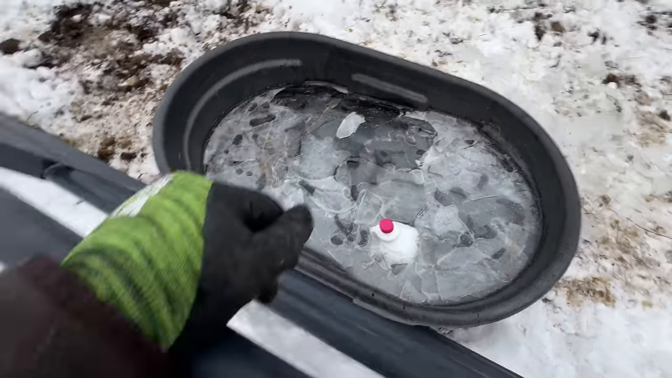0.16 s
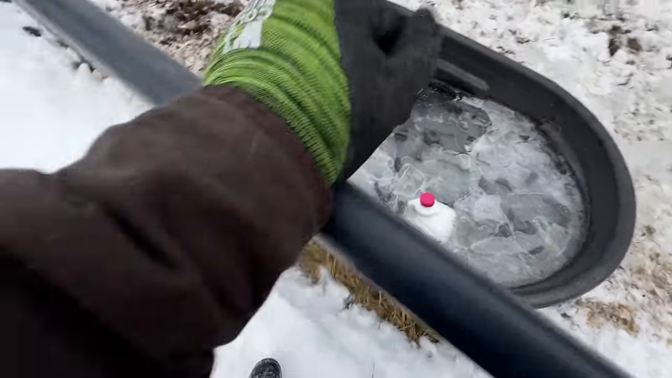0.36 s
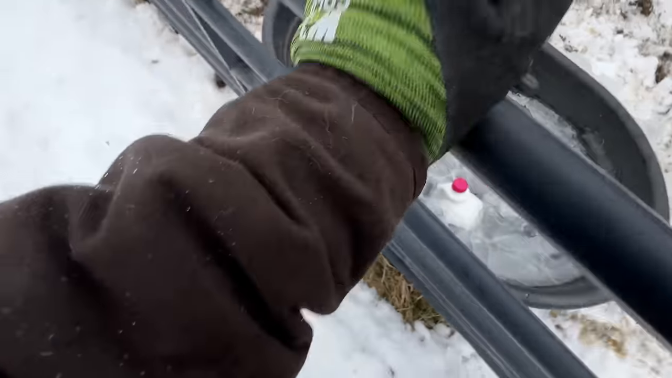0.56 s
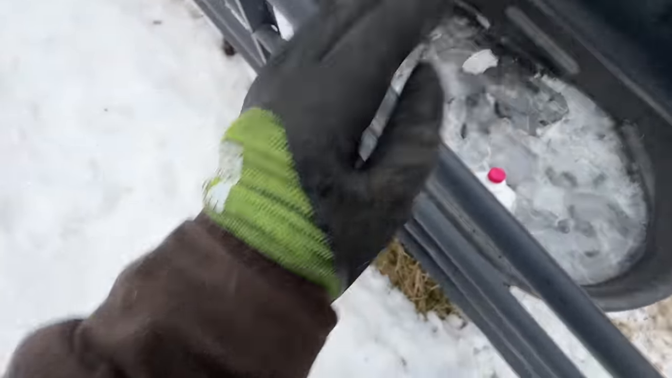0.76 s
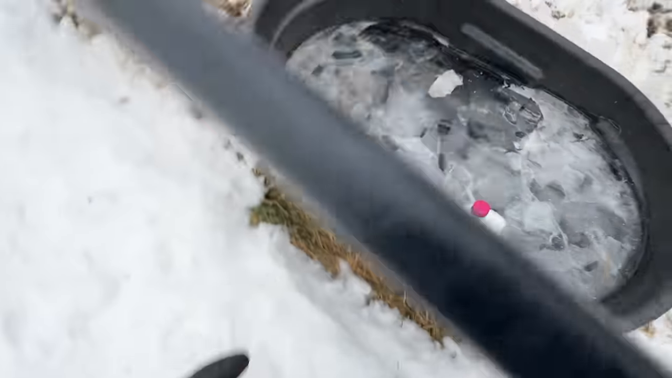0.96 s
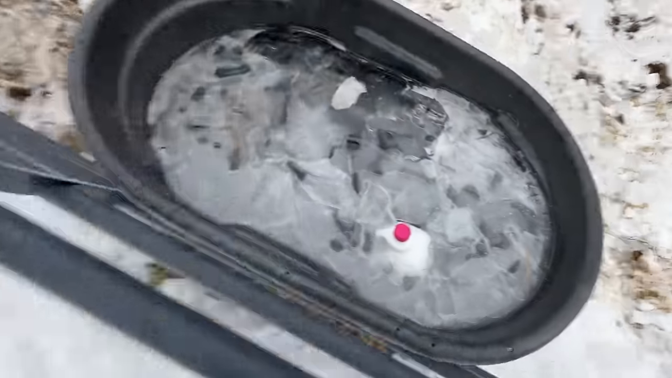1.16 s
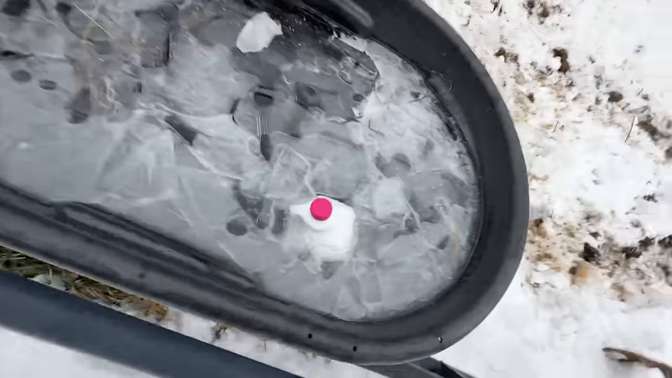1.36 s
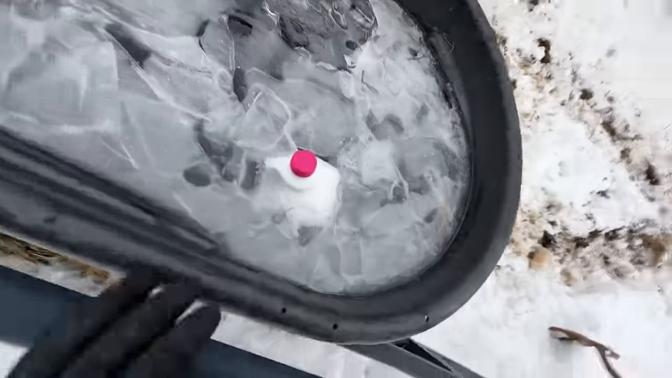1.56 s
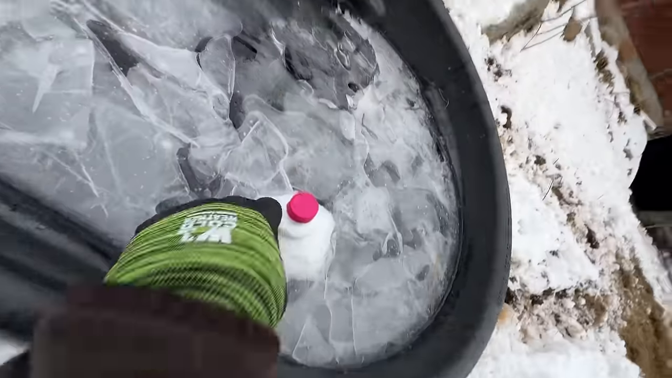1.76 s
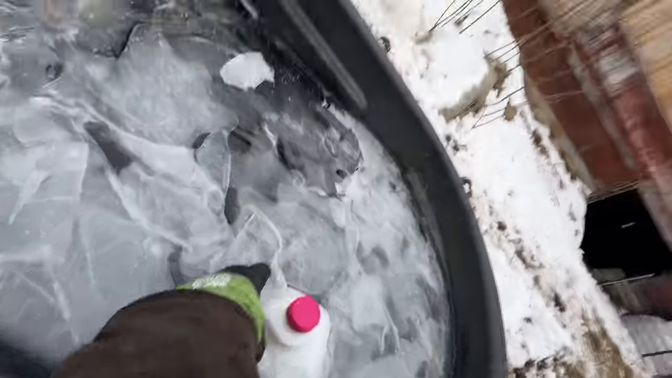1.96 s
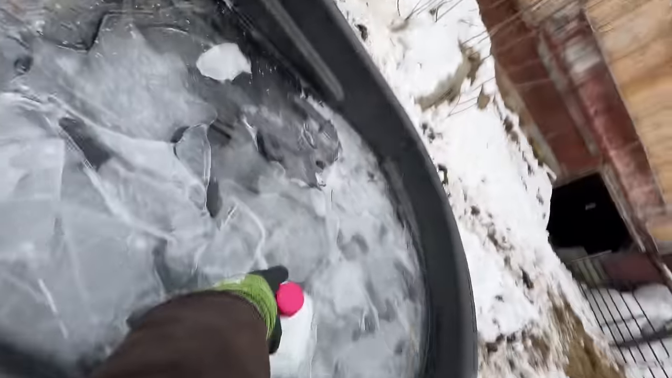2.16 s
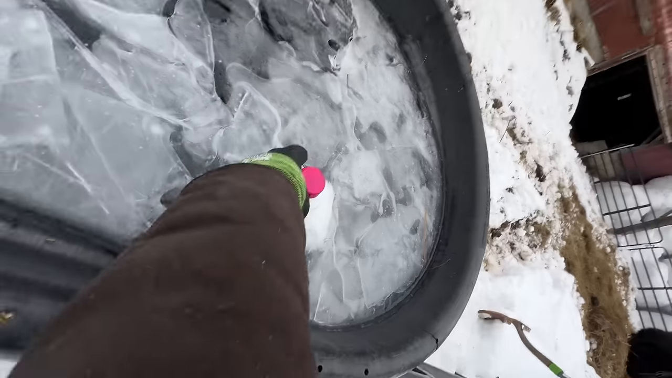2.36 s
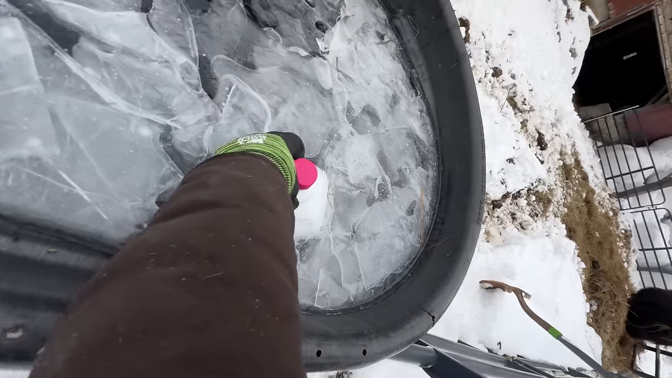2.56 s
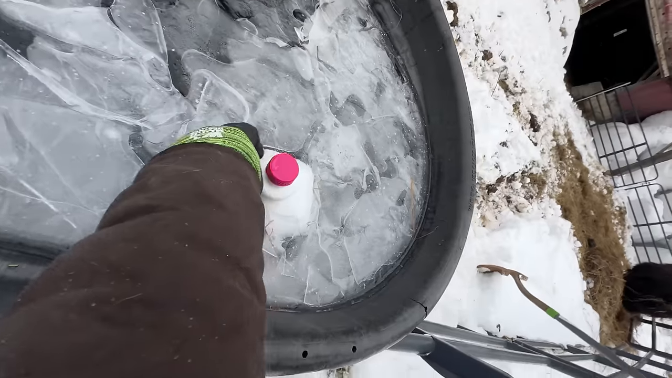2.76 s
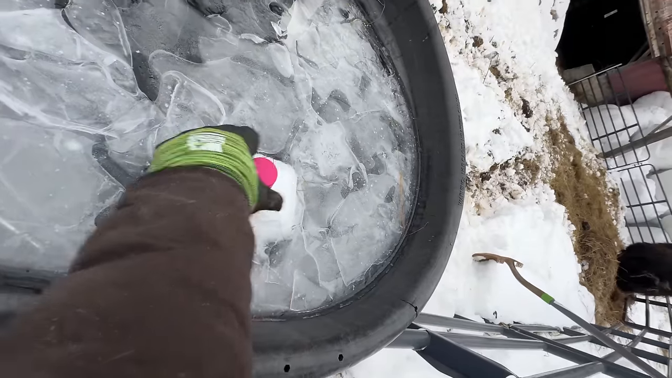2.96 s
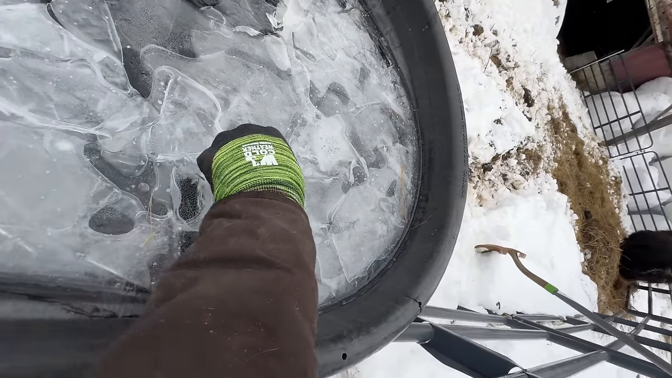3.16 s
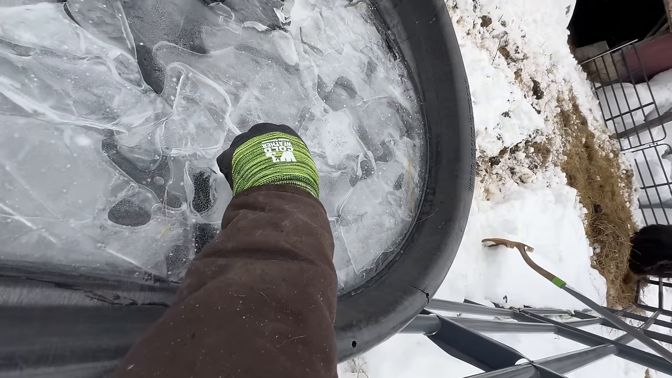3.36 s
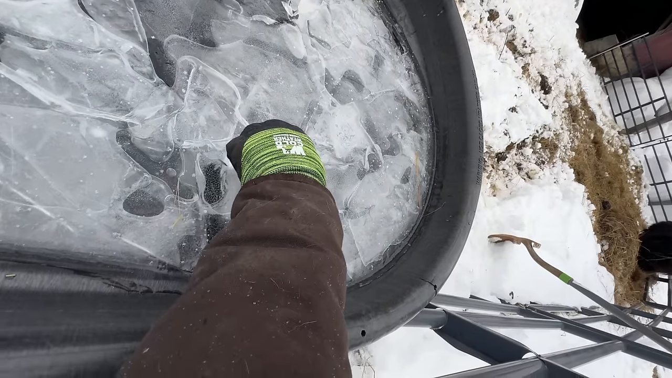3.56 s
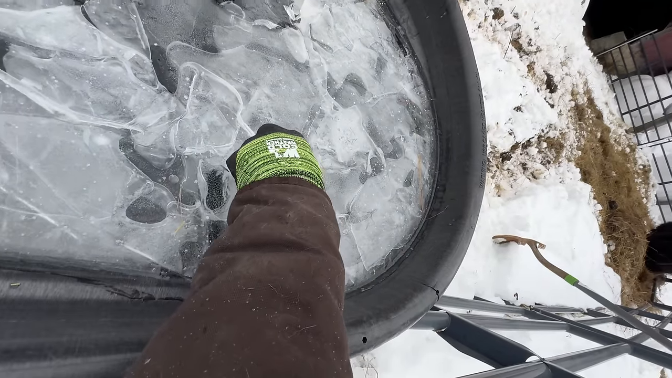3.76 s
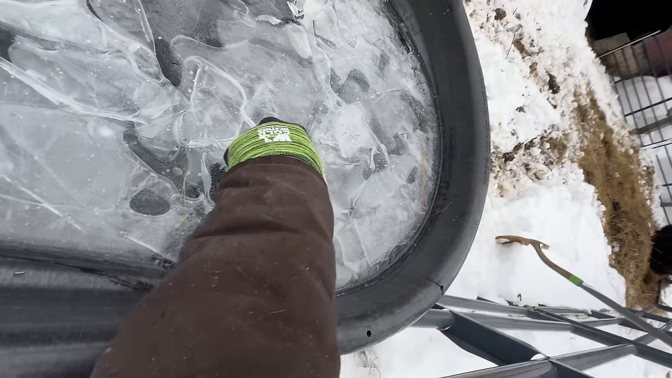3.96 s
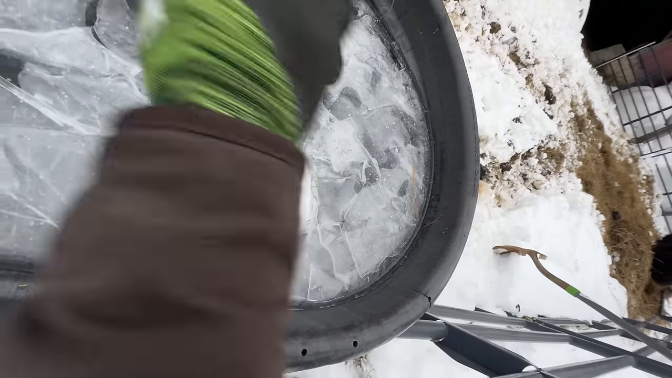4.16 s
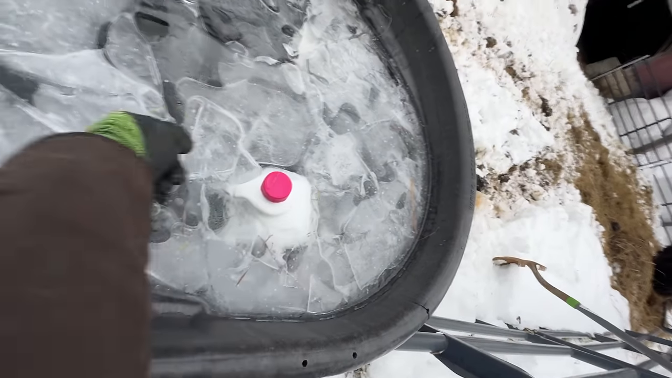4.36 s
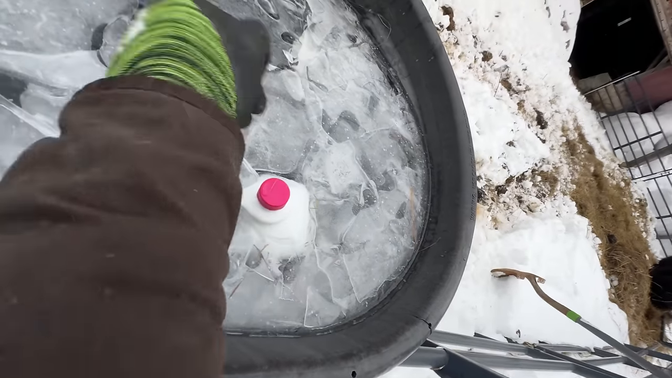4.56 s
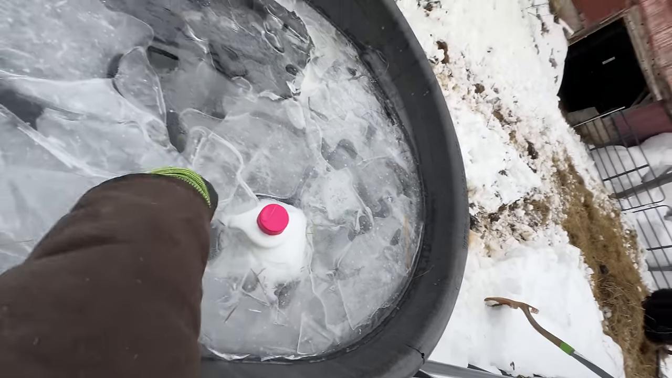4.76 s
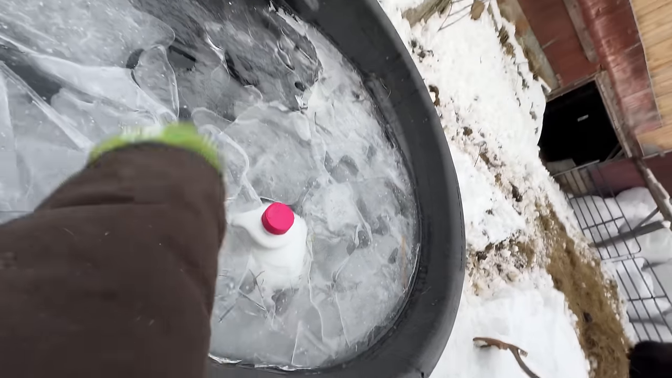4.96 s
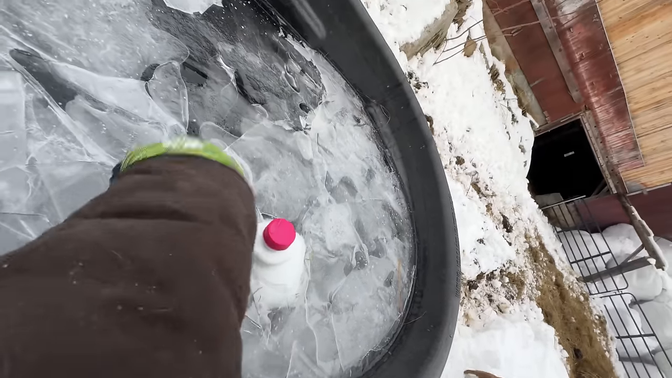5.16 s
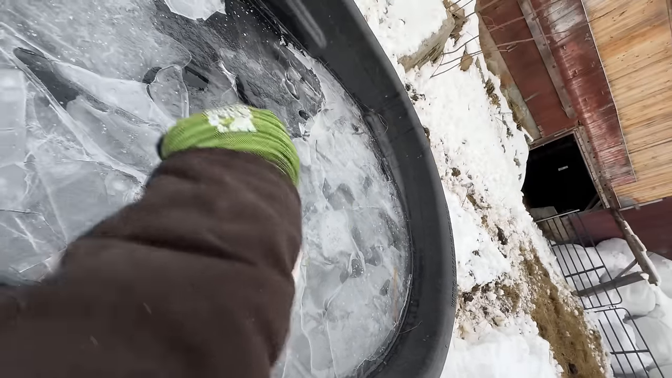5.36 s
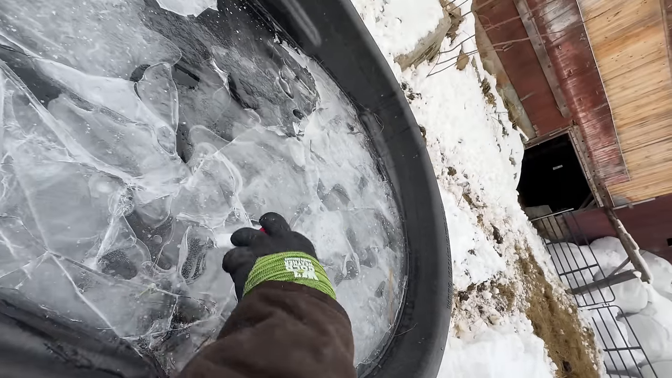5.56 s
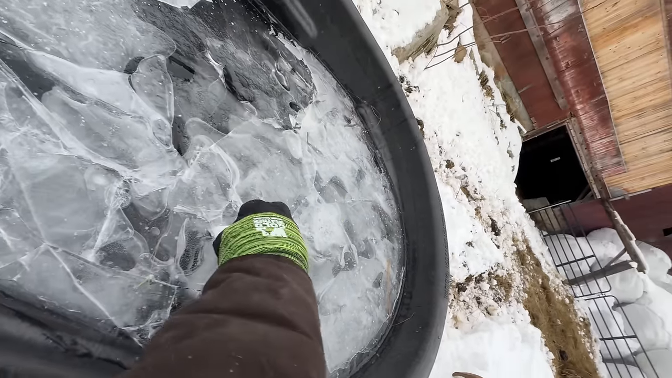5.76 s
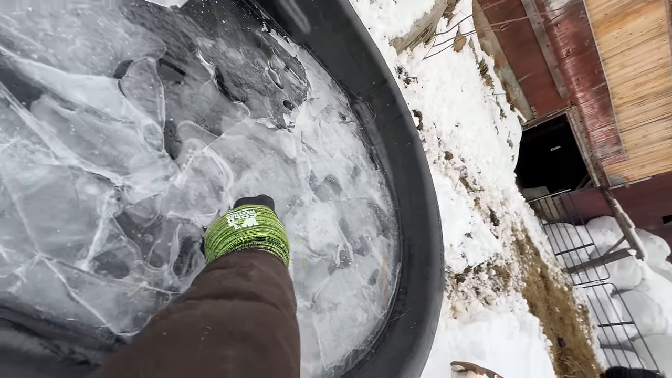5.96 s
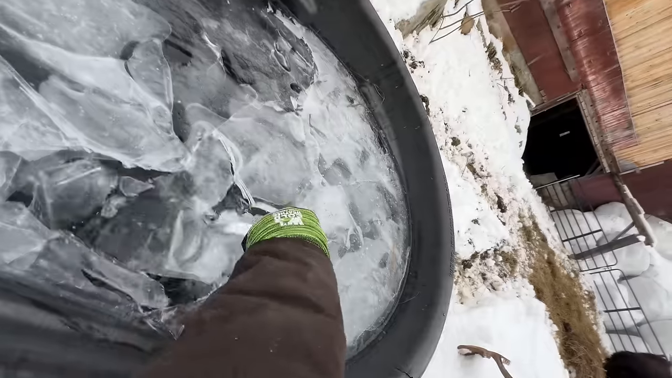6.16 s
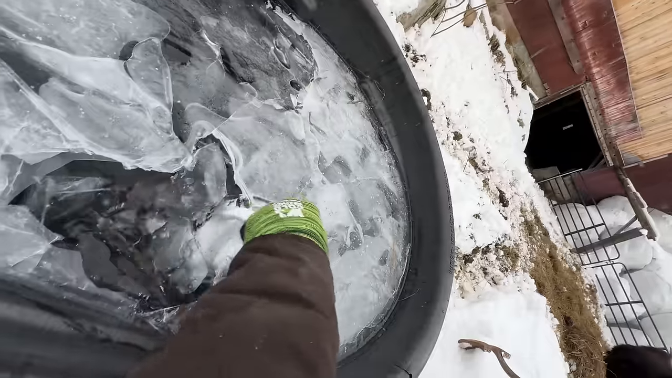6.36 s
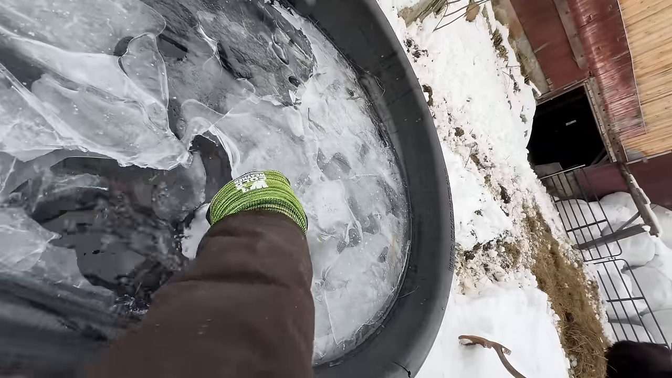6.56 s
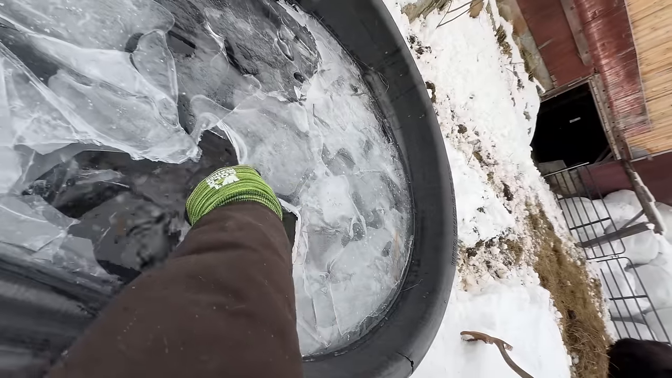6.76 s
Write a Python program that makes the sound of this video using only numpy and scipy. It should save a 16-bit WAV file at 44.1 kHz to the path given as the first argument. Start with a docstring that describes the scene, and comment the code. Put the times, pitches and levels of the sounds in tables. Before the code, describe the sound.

A sleeve rustles and knocks on metal rails, then fist punches boom on trough ice until it cracks apart, clinks and sloshes.

```python
"""Breaking the ice on a stock trough

Outdoors in snow, a gloved hand reaches through a steel gate to a plastic trough, its sleeve close to the microphone.
Cloth hisses and rubs (random slips, filtered) and the rails tap and bump; the ice ticks under a first push.
Three punches make the sheet boom on the water (decaying modes, a falling thud); a fourth blow comes as it gives way.
Plates crack, crumble and clink (fracture clicks, ringing shards) while water sloshes up (swarms of bubbles).
"""
import sys
import numpy as np
from scipy import signal
from scipy.fft import rfft, irfft, next_fast_len
from scipy.io import wavfile

SR = 44100
rng = np.random.default_rng(int(sys.argv[2]) if len(sys.argv) > 2 else 0)


def int16_out(signal):
    """Quantize to a 16-bit WAV file."""
    q = np.round(np.clip(np.atleast_2d(signal).T, -1, 1) * 32767)
    wavfile.write(sys.argv[1], SR, q.astype(np.int16))


N = 300762
TIME = np.arange(N) / SR   # s

# Table levels are relative: each source trims them as it is mixed.

# Two-port microphone: sound reaches the left port later by this lag; top of its range
PORT_LAG_S, CUTOFF_HZ = 4.25e-5, 15650
# Sound scattered by trough walls and body, against the direct sound: (pitch_hz, level_db)
SCATTER_SPECTRUM = [(100, -48.5), (300, -8), (700, 7.5), (2000, -2), (5000, 4.5), (8000, -2),
                    (12000, -20.5), (15500, 11.5)]
# The yard's faint tail
YARD_DB, YARD_T60_S = -21.5, 0.35

# Still air of the yard: (pitch_hz, level_db per Hz)
AIR_SPECTRUM = [(25, -18), (130, 18.5), (400, -8), (700, -15), (1200, -13), (2500, -13), (5000, -27),
                (9000, -22), (15500, -30)]
AIR_DB, AIR_WIDE_DB = -62, 14   # overall, and the diffuse part against the shared part

# Sleeve and glove rubbing close to the microphone, as curves: (time_s, dull_rub_db, fibre_hiss_db)
# The arm reaches in
REACH_CURVE = [(0.0, -91, -73), (0.1, -61, -67.5), (0.3, -60.5, -60.5), (0.49, -64.5, -64.5),
               (0.56, -59, -52.5), (0.8, -63, -58), (1.37, -52, -63), (1.61, -59, -56.5),
               (1.98, -56.5, -62), (2.16, -68.5, -60.5), (2.35, -63.5, -69)]
# The sleeve rubs softly and evenly between reaching and working
EVEN_RUB_CURVE = [(2.5, -58, -62), (2.92, -58, -62)]
# The arm works on the ice
LEAN_CURVE = [(2.99, -54.5, -54), (3.16, -59.5, -64), (3.42, -64.5, -69.5), (3.89, -67, -67),
              (4.3, -59.5, -60.5), (4.6, -67.5, -69.5), (4.93, -85, -105), (5.25, -66.5, -63.5),
              (5.37, -70.5, -81), (5.49, -62.5, -70), (5.6, -59.5, -63)]
# Strokes of glove and sleeve against the gate: (start_s, length_s, hiss_db, rub_db)
BRUSH_STROKES = [(0.243, 0.049, -60, -55), (0.657, 0.33, -60, -45), (0.949, 0.12, -44.5, -54),
                 (1.122, 0.077, -42.5, -35), (1.253, 0.055, -37.5, -33), (1.317, 0.052, -39, -35),
                 (1.371, 0.04, -41, -32), (1.412, 0.096, -39.5, -34.5), (1.563, 0.021, -46, -43),
                 (1.954, 0.099, -58.5, -44), (2.091, 0.045, -59, -42), (4.048, 0.044, -47.5, -48),
                 (5.447, 0.12, -80, -46), (5.632, 0.076, -70, -42.5)]
# Dull rub of cloth: (pitch_hz, level_db per Hz)
RUB_SPECTRUM = [(25, -9), (70, 1), (130, 0), (280, 2.5), (450, -3.5), (600, -11), (800, -20), (1200, -13),
                (1800, -13.5), (5000, -28)]
# Fine hiss of fibres: (pitch_hz, level_db per Hz)
FIBRE_SPECTRUM = [(400, -36), (900, -9), (1500, -1), (2400, 2.5), (3100, -0.5), (4800, -6), (7800, -1.5),
                  (10000, 7), (12000, -26), (15500, -15)]
FOLDS_DB = 2.0       # depth of the flutter as folds of cloth catch and pass
STROKE_RISE = 0.028  # share of a stroke's length that it takes to build up

# Arm bumping and dragging on the hollow gate rails: (start_s, length_s, level_db, pitch_hz)
RAIL_BUMPS = [(0.276, 0.027, -48.5, 328), (0.347, 0.014, -48, 590), (0.706, 0.21, -43.5, 285),
              (0.807, 0.011, -35, 230), (0.891, 0.011, -31.5, 300), (0.995, 0.039, -47, 297),
              (1.056, 0.021, -46, 236), (1.137, 0.026, -31, 322), (1.169, 0.028, -35, 246),
              (1.259, 0.029, -30.5, 266), (1.283, 0.081, -37, 100), (1.334, 0.027, -38.5, 417),
              (1.383, 0.041, -35, 252), (1.385, 0.028, -43.5, 520), (1.41, 0.097, -41.5, 147),
              (1.492, 0.03, -37, 221), (1.591, 0.015, -38, 130), (1.788, 0.0093, -41, 278),
              (1.966, 0.08, -37.5, 127), (1.969, 0.029, -45, 292), (5.571, 0.088, -47, 263),
              (5.657, 0.1, -42, 396)]
# Knuckles tapping the gate rail: (start_s, level_db, t60_s)
RAIL_TAPS = [(0.89, -15.5, 0.014), (1.049, -18, 0.032), (1.124, -24.5, 0.015), (2.093, -26.5, 0.013)]
# Rubber glove skidding on rail and ice: (start_s, length_s, level_db, pitch_hz)
GLOVE_SKIDS = [(1.282, 0.0095, -28, 8300), (2.961, 0.052, -55, 4620), (4.082, 0.014, -39, 4560),
               (5.61, 0.0085, -52, 2700)]
# Colour of a tapped rail: (pitch_hz, level_db per Hz)
RAIL_SPECTRUM = [(80, -17), (250, 10.5), (550, -15), (950, 2.5), (1400, -1), (2000, 0.5), (4000, -13),
                 (9000, -7.5), (15500, -11)]

# Large air pockets gulping under the plates: (start_s, level_db, starting pitch_hz)
AIR_GULPS = [(3.017, -28, 508), (6.392, -19, 150), (6.422, -14.5, 150), (6.424, -24, 331),
             (6.482, -14, 153), (6.503, -11.5, 327), (6.51, -12.5, 146), (6.564, -24, 171),
             (6.629, -18.5, 142), (6.688, -26.5, 430), (6.714, -23, 130)]

# Single cracks under the pressing hand and among loose plates: (start_s, level_db, t60_s, clack_db)
# clack_db is the plate's dull clack against its crack
ICE_CRACKS = [(3.087, -36, 0.037, 3.5), (3.108, -35, 0.24, -6.5), (3.233, -46.5, 0.022, 1),
              (3.35, -30, 0.11, -17), (3.485, -32.5, 0.078, -29), (3.594, -39, 0.11, -15),
              (3.8, -14, 0.054, -41.5), (3.844, -30.5, 0.086, -19.5), (4.085, -32.5, 0.071, -20),
              (4.136, -36.5, 0.038, -28), (5.136, -24.5, 0.16, -17), (5.554, -43, 0.069, -6),
              (5.578, -26, 0.032, -8.5), (5.64, -46, 0.032, -6), (5.701, -28.5, 0.083, -17.5),
              (5.756, -32.5, 0.022, -14), (5.79, -26, 0.19, -9), (5.854, -22.5, 0.12, -9.5),
              (5.889, -24.5, 0.091, -29), (5.905, -17.5, 0.06, -26), (5.922, -13, 0.042, -16),
              (6.011, -13, 0.13, -16.5), (6.056, -13, 0.046, -19), (6.096, -11.5, 0.098, -23),
              (6.136, -19, 0.04, -22), (6.172, -14.5, 0.074, -38), (6.192, -17, 0.063, -17),
              (6.217, -15, 0.038, -18), (6.237, -20.5, 0.049, -22), (6.294, -16, 0.052, -8),
              (6.318, -19, 0.035, -29), (6.382, -18, 0.035, -28), (6.391, -20, 0.02, -27),
              (6.42, -20.5, 0.029, -25), (6.455, -18, 0.094, -11.5), (6.474, -23, 0.074, -12),
              (6.509, -19, 0.017, -6), (6.527, -14.5, 0.052, -26), (6.572, -11.5, 0.052, -22),
              (6.589, -16, 0.054, -15), (6.619, -16.5, 0.02, -8.5), (6.635, -21.5, 0.027, -20)]
# Splitting ice: (pitch_hz, level_db per Hz)
FRACTURE_SPECTRUM = [(40, -11), (200, -7.5), (700, -2.5), (1200, -25), (1600, 3), (2700, 3.5), (4000, 1),
                     (5000, -1.5), (6800, 2), (9500, 7.5), (12000, -7), (15500, -6)]
# Dull clack of a plate: (pitch_hz, level_db per Hz)
CLACK_SPECTRUM = [(25, -50.5), (60, 0), (150, 5), (350, 2), (550, -0.5), (750, -5.5), (950, -4),
                  (1300, -10.5), (3000, -8.5), (8000, -25.5)]
# Before a crack the plate starts to give: time to grow by 60 dB, level before its trims
GIVE_S, GIVE_DB = 0.025, -3.5
# First split and its single sharpest click
SNAP_DB, SNAP_T60_S, CLICK_DB = 6, 0.011, 16

# Blows that set the whole sheet moving: (start_s, crack_db, boom_db, knock_db, sheet_lag_s, thud_db,
# thud_start_hz, ring_length (share of usual), node_hz (mode with a node under the fist), plate_hz)
ICE_PUNCHES = [(4.349, -10, -1, -6, 0.0046, -16.5, 608, 0.92, 232, 399),
               (4.68, -9, -6, -7.5, 0.002, -14.5, 656, 0.83, 172, 351),
               (5.022, -7, -2.5, -8, 0.0055, -14, 401, 0.8, 477, 297),
               (5.932, -9.5, 0.5, -11, 0.00703, -17, 559, 0.58, 318, 231)]
# Modes of the ice sheet on the water: (pitch_hz, level_db, t60_s before ring_length)
SHEET_MODES = [(83.4, -17.5, 0.3), (118.9, -5.5, 0.27), (136, -21.5, 0.66), (152.7, -9.5, 0.34),
               (221.4, 2, 0.074), (300, -8.5, 0.16), (366.5, -5.5, 0.18), (413, -11.5, 0.23),
               (458, -11.5, 0.23), (542, -1, 0.078), (663, -10, 0.07), (800, -19, 0.05), (904, -9.5, 0.074),
               (1170, -25, 0.097)]
PUNCH_T60_S, PUNCH_CLACK_DB = 0.077, -9
# The fist drives on and splits the ice again
FOLLOW_S, FOLLOW_DB, FOLLOW_CLACK_DB = 0.018, -9.5, -13
# Then the sheet rocks, and its edges tick ever more softly
ROCK_S, ROCK_DB, ROCK_LOSS_DB, ROCK_CLACK_DB = 0.054, -16.5, 10, -17.5
TICK_T60_S = 0.095   # small cracks that follow a punch
# Short bending waves arrive first, so the thud falls in pitch
THUD_LOW_HZ, THUD_GLIDE_S, THUD_T60_S, THUD_WIDTH_HZ = 130, 0.01784, 0.18, 111
NODE_DB, NODE_WIDTH = -13, 0.17   # a mode struck on its node hardly sounds; width as a share of its pitch
# The plate right under the fist, its t60 before ring_length; its pitch sinks from blow to blow
PLATE_DB, PLATE_T60_S = -14.5, 0.14

# Plates breaking off into the water: (start_s, crack_db, crumble_db, length_s, slosh_db)
PLATE_BREAKS = [(5.922, -20, -34, 0.005, -44), (5.935, -8, -20, 0.0068, -20),
                (5.963, -10.5, -23.5, 0.022, -25), (5.994, -11, -21, 0.03, -18.5),
                (6.079, -11, -28.5, 0.048, -33.5), (6.203, -20.5, -43, 0.023, -37),
                (6.281, -16.5, -28, 0.0064, -35), (6.497, -15.5, -26.5, 0.014, -36),
                (6.553, -13, -32, 0.058, -33.5), (6.684, -23.5, -41.5, 0.034, -37)]
BREAK_T60_S, BREAK_CLACK_DB = 0.11, -16
CRUMBLE_ATTACK_S, CRUMBLE_T60_S = 0.0028, 0.11
SLOSH_ATTACK_S, SLOSH_T60_S = 0.0039, 0.25
# Loose ice keeps grinding and water keeps lapping while the hand stirs
STIR_START_S, STIR_ATTACK_S, STIR_HOLD_S = 5.91, 0.013, 0.806
GRIND_DB, GRIND_T60_S, LAP_DB, LAP_T60_S = -42, 0.29, -39, 4.3
# Hollow tones of the water in the trough: (pitch_hz, level_db per Hz)
HOLLOW_SPECTRUM = [(40, -21), (95, -11), (150, 9), (240, -2.5), (335, 6.5), (480, -11), (660, -7),
                   (760, -19), (890, -8.5), (1500, -24.5), (5000, -29)]
JOSTLE_PER_S, JOSTLE_DB = 110, -46

# Thick plates clattering as they break free: (start_s, level_db, lowest pitch_hz)
FREED_CHUNKS = [(5.934, -14, 781), (5.963, -17, 1144), (6.006, -21, 881), (6.094, -30, 1086),
                (6.215, -30, 1500), (6.285, -14, 1008), (6.316, -27, 1018), (6.5, -20.5, 1083),
                (6.57, -25, 938)]
# Modes of such a plate: (multiple of its lowest pitch, level_db)
CHUNK_MODE_SERIES = [(1, -6.5), (1.27, -4.5), (1.99, 0), (2.85, -3.5), (3.82, 0)]
CHUNK_T60_S, CHATTER_T60_S = .055, .025

# Loose shards that ring out: (start_s, level_db, pitch_hz)
SHARD_CLINKS = [(5.994, -12.5, 3970), (6.0054, -8, 6620), (6.008, -17, 6700), (6.043, -24, 2900),
                (6.096, -29, 2650), (6.139, -22, 3160), (6.2362, -32, 3830), (6.315, -22, 3790),
                (6.331, -24, 2040), (6.405, -29, 2340), (6.457, -29, 4560), (6.5, -27, 4300),
                (6.571, -21, 3770), (6.621, -20, 9330), (6.633, -16, 8800), (6.66, -33, 4320)]
PAIR_RATIO = 1.035   # upper mode of a shard's close pair, against the lower


def from_db(db):
    """Decibels to gain."""
    return 10 ** (np.asarray(db) / 20)


def rms_one(x):
    """Scale a sound to an rms of 1."""
    return x / np.sqrt(np.mean(x ** 2) + 1e-20)


def gains(rows):
    """The dB columns of a curve as gains at every sample."""
    s, *columns = np.transpose(rows)
    return [from_db(np.interp(TIME, s, column)) for column in columns]


def add(track, s, sound):
    """Lay a sound into a track at a given time."""
    start = round(s * SR)
    track[start:start + len(sound)] += sound[:N - start]


def fade(t60):
    """An exponential decay, half a second long."""
    return from_db(-60 * TIME[:SR // 2] / max(t60, .003))


def tint(x, spectrum, keep_power=True):
    """Causal (minimum-phase) filter with the given spectrum."""
    size = 4096
    hz, db = np.transpose(spectrum)
    grid = np.maximum(np.fft.rfftfreq(size, 1 / SR), 1)
    gain = from_db(np.interp(np.log(grid), np.log(hz), db))
    if keep_power:
        gain = rms_one(gain)
    # folding the cepstrum onto positive times gives minimum phase
    cepstrum = irfft(np.log(gain))
    cepstrum[1:size // 2] *= 2
    cepstrum[size // 2 + 1:] = 0
    impulse = irfft(np.exp(rfft(cepstrum)))
    return signal.oaconvolve(x, impulse)[:len(x)]


def ring(x, hz, t60):
    """A two-pole resonator: a unit click sets a sine of height 1 ringing."""
    r = from_db(-60 / (max(t60, .001) * SR))
    w = 2 * np.pi * hz / SR
    return signal.lfilter([0, np.sin(w)], [1, -2 * r * np.cos(w), r * r], x + 1e-18)


def grains(per_s, spread_db, size=N):
    """Random clicks of exponentially spread dB sizes and either sign; rms 1."""
    sizes = from_db(spread_db * np.minimum(rng.exponential(1, size), 4))
    signs = rng.choice([-1, 1], size)
    struck = rng.random(size) < per_s / SR
    return rms_one(sizes * signs * struck)


def flutter(per_s, depth_db, size=N):
    """A gain that wanders at random about 1."""
    wander = np.interp(TIME[:size] * per_s, np.arange(4000), rng.standard_normal(4000))
    return from_db(depth_db * wander)


def swarm(clicks, low_hz, high_hz, cycles, count=24):
    """Each click rings one of many small resonators for some cycles; rms 1."""
    dealt = rng.integers(0, count, len(clicks))
    pitches = np.geomspace(low_hz, high_hz, count)
    return rms_one(sum(ring(clicks * (dealt == k), hz, cycles / hz) for k, hz in enumerate(pitches)))


def burst(t60, per_s, spread_db):
    """A run of tiny slips or fractures that builds within a millisecond and dies away."""
    whole = fade(t60)
    n = min(len(whole), round(1.5 * max(t60, .003) * SR))
    envelope = whole[:n] * (1 - np.exp(-TIME[:n] / .0007))
    run = grains(per_s, spread_db, size=n) * envelope
    # the energy of the envelope, however the clicks fall
    run = run * np.sqrt(np.sum(envelope ** 2) / (np.sum(run ** 2) + 1e-20))
    return np.pad(run, (0, len(whole) - n))


def stroke(length):
    """A sliding contact builds up, holds, and lets go; one second long."""
    progress = TIME[:SR] / max(length, .003)
    return (1 - np.exp(-progress / STROKE_RISE)) * np.exp(-np.minimum(progress, 3) ** 4)


def swell(since, attack, hold, t60):
    """A gain that rises, holds and dies away, given the time since its start."""
    t = np.maximum(since, 0)
    return (1 - np.exp(-t / attack)) * from_db(-60 * np.clip((t - hold) / t60, 0, 3))


def shifting(x, per_s, depth_db, count=16):
    """Each band swells and fades on its own, so that the colour of a sound keeps moving."""
    n = x.shape[-1]
    size = next_fast_len(n)
    log_hz = np.log(np.fft.rfftfreq(size, 1 / SR) + 1)
    place = np.interp(log_hz, np.log([120, 14000]), [0, count - 1])
    spectrum = rfft(x, size)
    total = 0
    for k in range(count):
        overlap = np.maximum(1 - abs(place - k), 0)   # neighbouring bands cross over
        band = irfft(spectrum * overlap, size)[..., :n]
        total = total + band * flutter(per_s, depth_db, size=n)
    return total


def at_ports(x, scatter_db, t60, count=5):
    """The left port hears the direct sound later; near reflections change as hand and ice move."""
    size = next_fast_len(N + SR // 2)
    lag = np.exp(-2j * np.pi * np.fft.rfftfreq(size, 1 / SR) * PORT_LAG_S)
    left = irfft(rfft(x, size) * lag, size)[:N]
    out = np.array([left, x])
    scattered = from_db(scatter_db) * tint(x, SCATTER_SPECTRUM, keep_power=False)
    decay = fade(t60)[:int(t60 * SR) + 2]
    moments = TIME[::SR // 25]
    path = np.cumsum(rng.integers(1, max(count, 2), len(moments))) % count
    for k in range(count):
        share = np.sqrt(np.interp(TIME, moments, path == k))   # one set of paths hands over to the next
        echoes = rng.standard_normal((2, len(decay))) * decay / np.sqrt(np.sum(decay ** 2))
        out += signal.oaconvolve((scattered * share)[None], echoes, axes=1)[:, :N]
    return out


def air():
    """The faint, even hush of the yard: filtered noise, mostly different at each port."""
    shared, left, right = [tint(rng.standard_normal(N), AIR_SPECTRUM) for _ in range(3)]
    diffuse = np.array([tint(port, SCATTER_SPECTRUM, keep_power=False) for port in (left, right)])
    return from_db(AIR_DB) * (shared + from_db(AIR_WIDE_DB) * diffuse)


def cloth_patch(rub, hiss):
    """One patch of cloth sticking and slipping: a lumpy rub and a fine hiss of fibres."""
    dull = tint(rub * grains(per_s=2500, spread_db=5.0), RUB_SPECTRUM)
    fine = tint(hiss * grains(per_s=5000, spread_db=2.0), FIBRE_SPECTRUM)
    return dull + fine


def sleeve():
    """Cloth slips over the rails close to the microphone, too wide a patch to sound alike at both ports."""
    rub, hiss = gains(np.vstack([REACH_CURVE, EVEN_RUB_CURVE, LEAN_CURVE]))
    for s, length, hiss_db, rub_db in BRUSH_STROKES:
        add(hiss, s, from_db(hiss_db - 6.0) * stroke(length))
        add(rub, s, from_db(rub_db - 13.5) * stroke(length))
    rub = rub * flutter(per_s=230, depth_db=2.0)
    hiss = hiss * flutter(per_s=210, depth_db=1.95)
    folds = flutter(per_s=21, depth_db=FOLDS_DB)
    rub, hiss = rub * folds, hiss * np.sqrt(folds)
    direct, left, right = [cloth_patch(rub, hiss) for _ in range(3)]
    wide = np.array([tint(port, SCATTER_SPECTRUM, keep_power=False) for port in (left, right)])
    # air pushed between the ports, in opposite senses
    draught = from_db(3.5) * tint(rub * grains(per_s=3000, spread_db=1.5), RUB_SPECTRUM)
    cloth = at_ports(direct, scatter_db=7.5, t60=0.032, count=4)
    cloth = cloth + from_db(8.5) * wide + draught * [[1], [-1]]
    return shifting(cloth, per_s=16, depth_db=2.0, count=10)


def glove():
    """Short taps on the rail, soft hollow bumps, and skids: fast slips that sound in one broad resonance."""
    taps, bumps, skids = np.zeros((3, N))
    for s, length, db, hz in RAIL_BUMPS:
        hollow = rms_one(ring(rng.standard_normal(SR), hz, 9.5 / hz))
        add(bumps, s, from_db(db) * hollow * stroke(length))
    for s, db, t60 in RAIL_TAPS:
        add(taps, s, from_db(db - 5.0) * burst(t60, per_s=3400, spread_db=7.0))
    for s, length, db, hz in GLOVE_SKIDS:
        slips = rms_one(ring(rng.standard_normal(SR), hz, 9 / hz))
        add(skids, s, from_db(db + 6.0) * slips * stroke(length))
    return tint(taps, RAIL_SPECTRUM) + bumps + skids


def gulps():
    """An air pocket rings for some cycles, its pitch rising a little as it comes up."""
    out, t = np.zeros(N), TIME[:SR // 2]
    for s, db, hz in AIR_GULPS:
        tone = np.sin(2 * np.pi * hz * t * (1 + 0.19 * t))
        add(out, s, from_db(db - 3.0) * tone * (1 - np.exp(-t / 0.0012)) * fade(0.11))
    return out


def fractures(count=3):
    """Every crack, from pressing, punching, rocking and breaking: (start_s, level_db, t60_s, clack_db)."""
    rows = list(ICE_CRACKS) + [(s, db, BREAK_T60_S, BREAK_CLACK_DB) for s, db, *_ in PLATE_BREAKS]
    for s, db, *_ in ICE_PUNCHES:
        rows.append((s, db, PUNCH_T60_S, PUNCH_CLACK_DB))
        rows.append((s + FOLLOW_S, db + FOLLOW_DB, TICK_T60_S, FOLLOW_CLACK_DB))
        for k in range(count):
            tick_db = db + ROCK_DB - ROCK_LOSS_DB * k
            rows.append((s + ROCK_S * (k + 1), tick_db, TICK_T60_S, ROCK_CLACK_DB))
    return rows


def cracks():
    """A growing crunch, a sharp snap and a run of tiny fractures; each plate clacks and rings."""
    snaps, clacks, plates = np.zeros((3, N))
    for s, db, t60, clack_db in fractures():
        snap = from_db(SNAP_DB) * burst(SNAP_T60_S, per_s=17000, spread_db=3.5)
        snap[:2] += from_db(CLICK_DB) * np.array([1, -1])
        run = from_db(db - 7.0) * (snap + burst(t60, per_s=3000, spread_db=4.5))
        pitches = 1100 * 7 ** rng.random(12)   # each plate has pitches of its own
        modes = sum(ring(run, hz, 45 / hz) for hz in pitches)
        # a reversed burst grows up to the moment of the crack
        give = from_db(db + clack_db + GIVE_DB) * burst(GIVE_S, per_s=5000, spread_db=-1)[::-1]
        give_s = s - len(give) / SR
        add(snaps, give_s, from_db(-10.0) * give)
        add(clacks, give_s, from_db(-6.5) * give)
        add(snaps, s, run)
        add(plates, s, from_db(-12.5) * rms_one(modes) * np.std(run))
        add(clacks, s, from_db(db + clack_db) * burst(2.35 * t60, per_s=3000, spread_db=1.5))
    return tint(snaps, FRACTURE_SPECTRUM) + plates + tint(clacks, CLACK_SPECTRUM)


def thud(start_hz):
    """The rough bending of the sheet under the fist: a broad resonance that slides down."""
    t = TIME[:SR // 2]
    pitch = THUD_LOW_HZ + (start_hz - THUD_LOW_HZ) * np.exp(-t / THUD_GLIDE_S)
    angle = 2 * np.pi * np.cumsum(pitch) / SR
    lowpass = signal.butter(2, THUD_WIDTH_HZ, fs=SR, output="sos")
    rough = signal.sosfilt(lowpass, rng.standard_normal((2, len(t))))
    envelope = fade(THUD_T60_S) * (1 - np.exp(-t / 0.0013))
    sound = (rough[0] * np.sin(angle) + rough[1] * np.cos(angle)) * envelope
    return rms_one(sound) * np.sqrt(np.mean(envelope ** 2))


def sheet():
    """The fist knocks the sheet's modes, which waver as plates rock, and the plate under it, with a thud."""
    out, t = np.zeros(N), TIME[:SR // 2]
    for s, _, boom_db, knock_db, lag, thud_db, thud_hz, ring_length, node_hz, plate_hz in ICE_PUNCHES:
        for hz, mode_db, t60 in SHEET_MODES:
            detune, strength, phase = rng.standard_normal(3)
            build = 1 - np.exp(-(t * hz / 0.81) ** 2)   # a mode takes a cycle or so to build up
            level = mode_db + (boom_db if hz < 260 else knock_db) + 1.0 * strength - 6
            level += NODE_DB * np.exp(-(np.log(hz / node_hz) / NODE_WIDTH) ** 2)
            waver = flutter(per_s=58, depth_db=1.5, size=len(t))
            tone = np.sin(2 * np.pi * (hz * (1 + 0.026 * detune) * t + phase))
            add(out, s + lag, from_db(level) * build * waver * fade(t60 * ring_length) * tone)
        plate = (1 - np.exp(-t * plate_hz)) * np.sin(2 * np.pi * plate_hz * t)
        add(out, s + lag, from_db(PLATE_DB) * plate * fade(PLATE_T60_S * ring_length))
        add(out, s + lag, from_db(thud_db) * thud(thud_hz))
    return out


def churn(t):
    """How hard ice crumbles and water sloshes: a surge at every break, over the steady stirring."""
    stirred = t - STIR_START_S
    crackle = from_db(GRIND_DB) * swell(stirred, STIR_ATTACK_S, STIR_HOLD_S, GRIND_T60_S)
    slosh = from_db(LAP_DB) * swell(stirred, STIR_ATTACK_S, STIR_HOLD_S, LAP_T60_S)
    for s, _, crumble_db, length, slosh_db in PLATE_BREAKS:
        crumble_surge = from_db(crumble_db) * swell(t - s, CRUMBLE_ATTACK_S, length, CRUMBLE_T60_S)
        slosh_surge = from_db(slosh_db) * swell(t - s, SLOSH_ATTACK_S, length, SLOSH_T60_S)
        crackle = np.hypot(crackle, crumble_surge)
        slosh = np.hypot(slosh, slosh_surge)
    return crackle, slosh


def collapse():
    """Plates grind into ringing crumbs, while water folds over them in bubbles and splashes."""
    start = round(5.7 * SR)   # shortly before the first break
    n = N - start
    crackle, slosh = churn(TIME[start:])
    crumbs = grains(per_s=800, spread_db=3.5, size=n) * flutter(per_s=47, depth_db=2.5, size=n)
    tinkle = swarm(grains(per_s=1300, spread_db=4.0, size=n), 1694, 9030, cycles=46, count=70)
    ice = from_db(0.5) * tint(crumbs, FRACTURE_SPECTRUM) + from_db(-8.5) * tinkle
    ice = shifting(ice, per_s=70, depth_db=2.5)
    bubbles = swarm(grains(per_s=330, spread_db=1.5, size=n), 126, 539, cycles=36.0)
    splash = swarm(grains(per_s=1000, spread_db=4.0, size=n), 660, 3500, cycles=13, count=40)
    surge = tint(grains(per_s=1800, spread_db=2.5, size=n), HOLLOW_SPECTRUM)
    bright = crackle * (ice + from_db(-17.5) * splash)
    deep = slosh * (from_db(-7) * bubbles + from_db(0.5) * surge)
    return np.pad(bright + deep, (start, 0))


def jostle():
    """Loose shards of all sizes knock together, each with a short bright click."""
    start = round(STIR_START_S * SR)
    clicks = grains(per_s=JOSTLE_PER_S, spread_db=3.0, size=N - start)
    knocks = swarm(clicks, 2200, 13000, cycles=6.1, count=20)
    stirring = swell(TIME[start:] - STIR_START_S, STIR_ATTACK_S, STIR_HOLD_S, GRIND_T60_S)
    return np.pad(from_db(JOSTLE_DB) * knocks * stirring, (start, 0))


def chunks():
    """A freed plate is struck once, chatters briefly against its neighbours and rings in its few modes."""
    out = np.zeros(N)
    for s, db, hz in FREED_CHUNKS:
        chatter = burst(CHATTER_T60_S, per_s=390, spread_db=5.5)
        chatter[0] += np.abs(chatter).max()
        for multiple, mode_db in CHUNK_MODE_SERIES:
            mode = ring(chatter, hz * multiple, CHUNK_T60_S)
            add(out, s, from_db(db + mode_db - 5.5) * mode / np.abs(mode).max())
    return out


def clinks():
    """A free shard rings with a close pair of modes."""
    out, t = np.zeros(N), TIME[:SR // 2]
    for s, db, hz in SHARD_CLINKS:
        pair = np.sin(2 * np.pi * hz * t) + 0.23 * np.sin(2 * np.pi * hz * PAIR_RATIO * t)
        add(out, s, from_db(db - 2) * pair * fade(0.027))
    return out


def scene():
    """Everything in the trough shares its reflections; the yard adds a faint tail and still air."""
    ice = sheet() + cracks() + chunks() + clinks()
    water = collapse() + jostle() + gulps()   # with the loose ice in it
    trough = at_ports(ice + water, scatter_db=-2.0, t60=0.044)
    yard = from_db(YARD_DB) * at_ports(trough[1], scatter_db=-2, t60=YARD_T60_S, count=1)
    arm = sleeve() + at_ports(glove(), scatter_db=-2.0, t60=0.035, count=1)
    # both are a little louder on the left
    return (trough + yard) * from_db([[.5], [-.5]]) + arm * from_db([[.7], [-.7]]) + air()


def record(dry):
    """The microphone drops the deepest bass, rounds the highest peaks and cuts the top."""
    x = signal.sosfilt(signal.butter(2, 38, "high", fs=SR, output="sos"), dry)
    x = .82 * np.tanh(x / .82)
    return signal.sosfilt(signal.ellip(12, .2, 80, CUTOFF_HZ, fs=SR, output="sos"), x)


dry = scene()
out = record(dry)
int16_out(out)
```